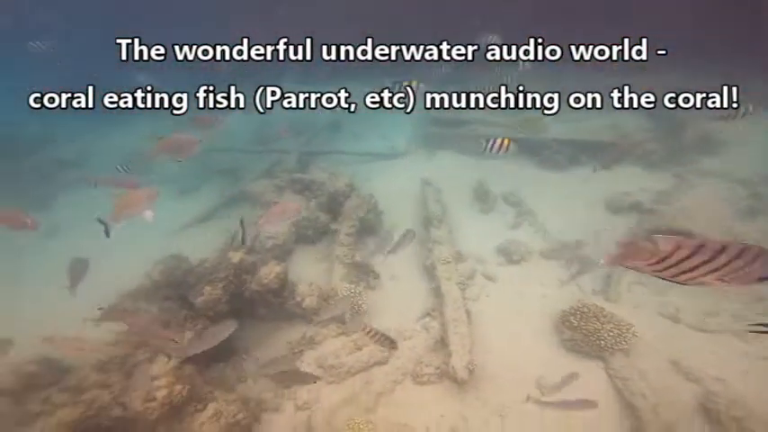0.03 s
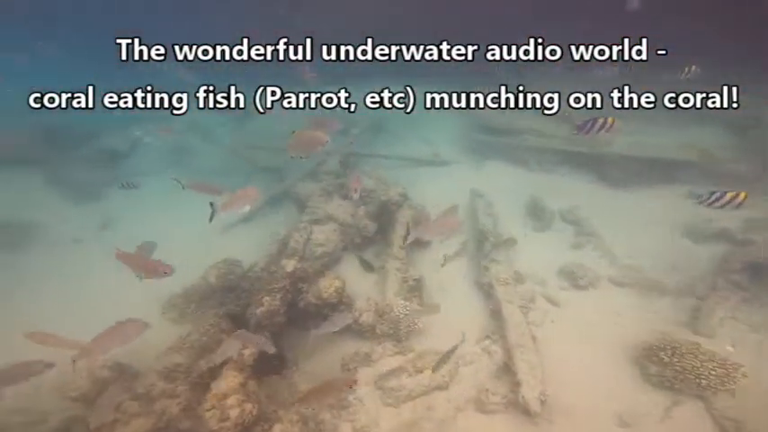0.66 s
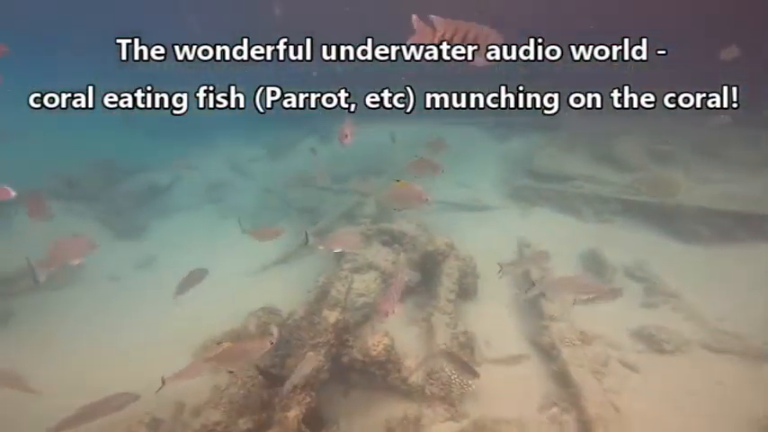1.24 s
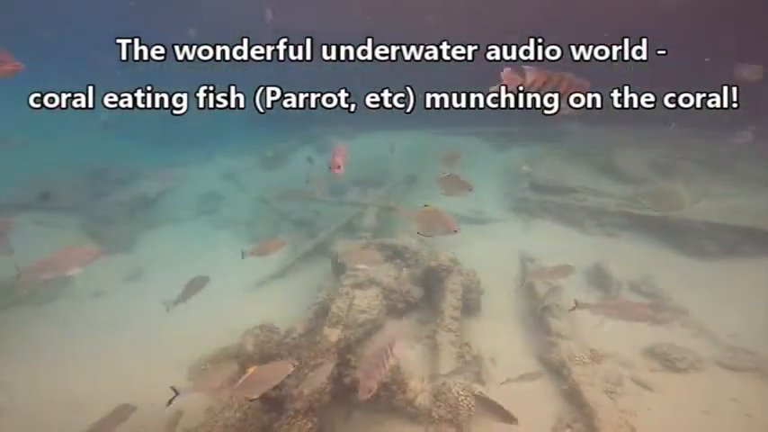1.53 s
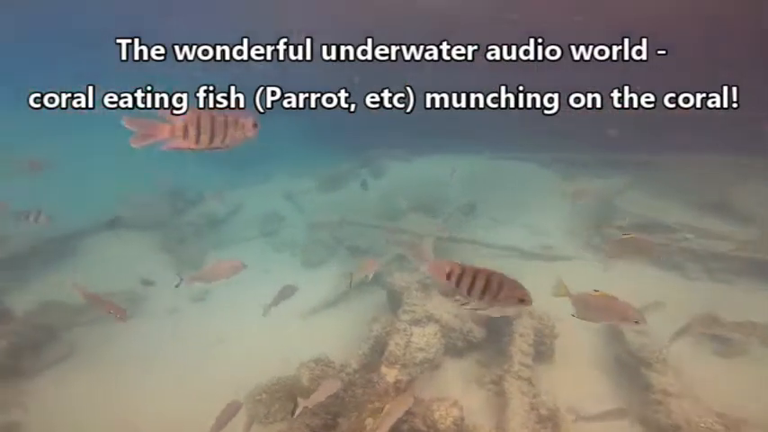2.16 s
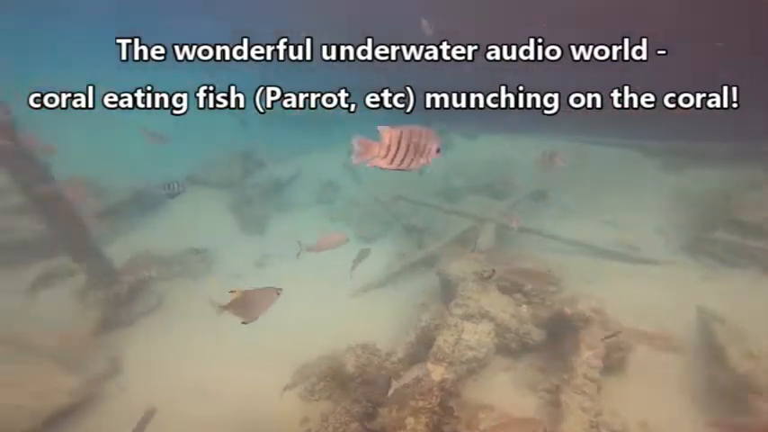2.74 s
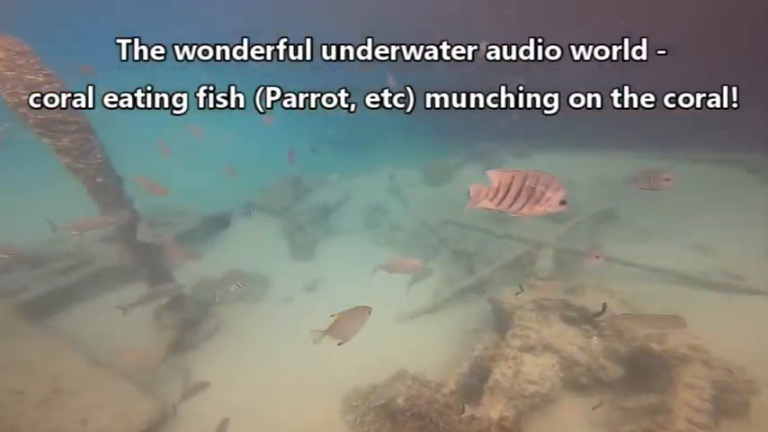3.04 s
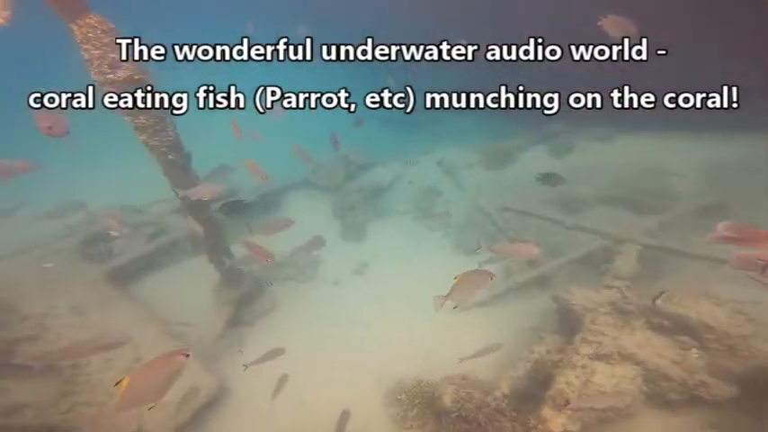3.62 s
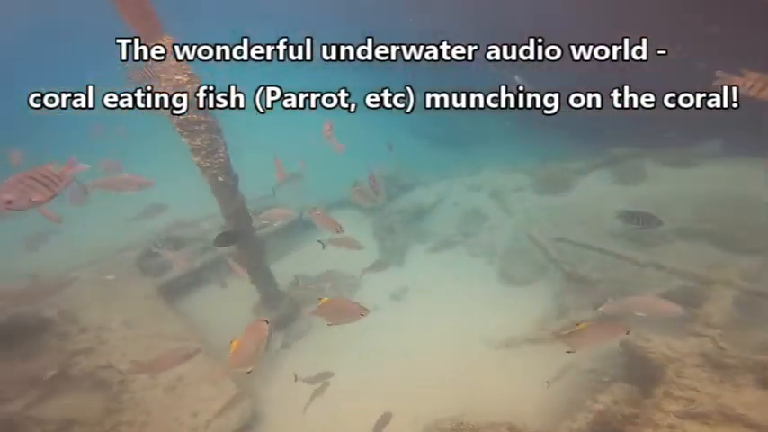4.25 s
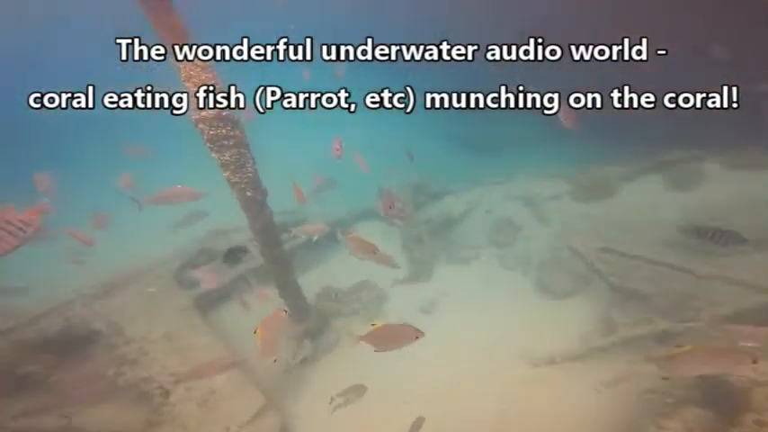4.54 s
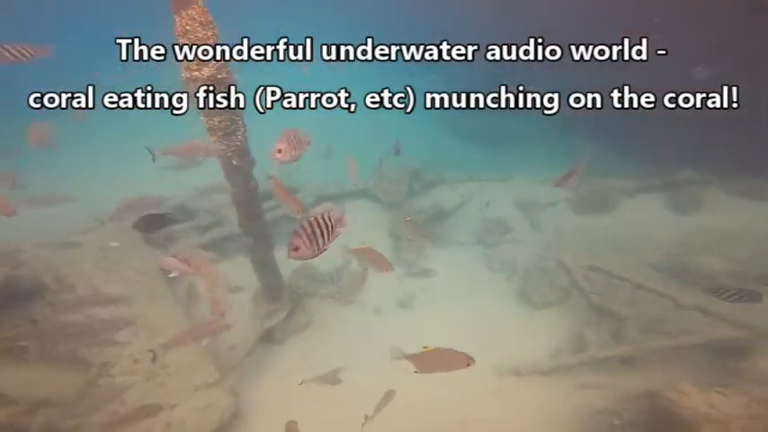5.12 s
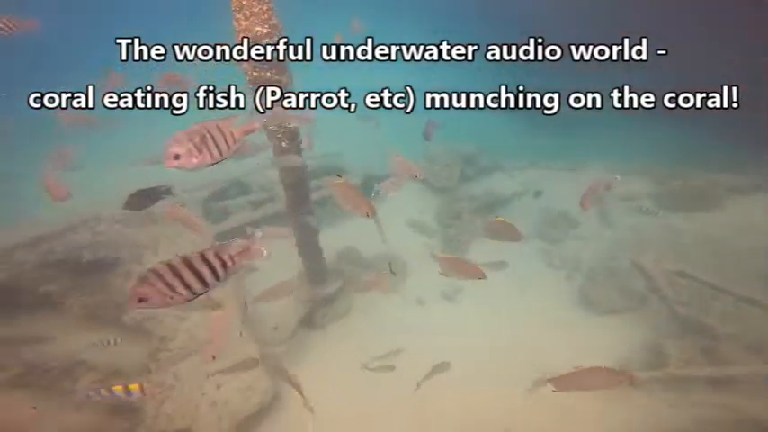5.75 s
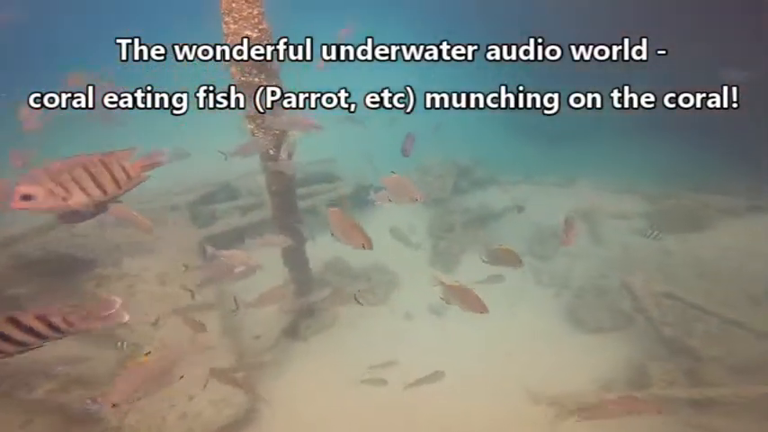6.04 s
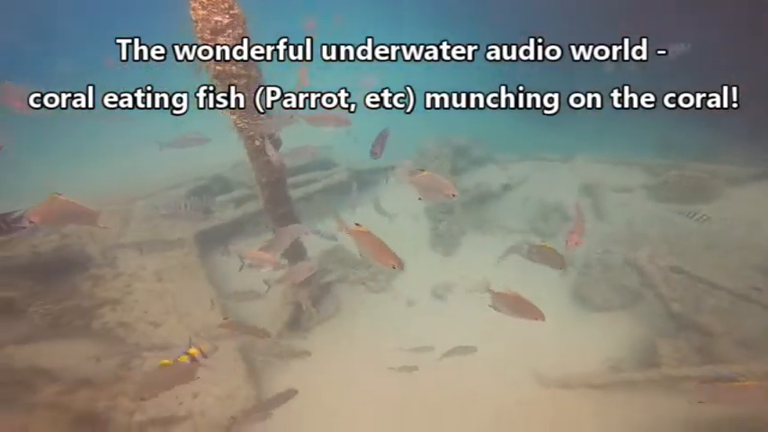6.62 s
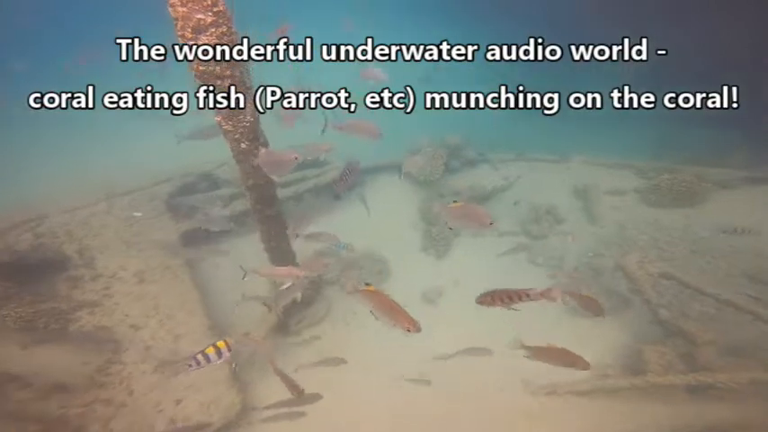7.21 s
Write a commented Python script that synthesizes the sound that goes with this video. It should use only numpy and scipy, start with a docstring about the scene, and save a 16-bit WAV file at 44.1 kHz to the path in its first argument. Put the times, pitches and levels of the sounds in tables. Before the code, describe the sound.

Fish bite coral and shrimps snap all around, a dense, uneven run of sharp clicks and occasional louder crunches over a faint frying crackle. Water sloshes past in surges, strongest at the start, and air bubbles gulp and ping. The microphone is underwater inside a camera housing, which rumbles in the hand and takes a few dull knocks after about a second.

```python
"""Coral reef, under water, heard through a camera's waterproof housing. Fish bite and scrape coral and
shrimps snap, near and far: sharp pulses with splintering and echoes that ring the housing's modes.
Air bubbles gulp and ping as damped tones; water sloshes past in surges of noise and small bubbles.
The hand that holds the housing rumbles and knocks."""
import sys
import numpy as np
from scipy import signal
from scipy.fft import rfft, irfft, next_fast_len
from scipy.io import wavfile
from scipy.ndimage import uniform_filter1d, map_coordinates

SR = 44100
rng = np.random.default_rng(int(sys.argv[2]) if len(sys.argv) > 2 else 0)


def generate_wav(sig):
    """Save sig (samples, or channels by samples) to the path in sys.argv[1] as 16-bit PCM at SR."""
    pcm = np.round(np.clip(np.atleast_2d(sig).T, -1, 1) * 32767).astype(np.int16)
    wavfile.write(sys.argv[1], SR, pcm)


N = 325017

# big coral pieces breaking: (time [s], relative level [dB], brightness centre [Hz], splintering [dB],
# lower mode [Hz], upper mode [Hz])
CORAL_BREAKS = [(0.4509, -29.5, 2650, 1, 2170, 5100), (0.9818, -33, 3900, -10, 1830, 7000),
                (1.8523, -26, 2670, -35, 2930, 3700), (2.5838, -32.5, 2930, -20, 1850, 3700),
                (2.6916, -33.5, 4070, -24, 3880, 5140), (2.834, -36, 3580, -30, 3700, 4500),
                (4.3138, -28, 3530, -4, 3650, 4580), (4.9078, -31.5, 2800, 1, 1840, 7300),
                (5.1998, -28.5, 4700, -10, 4100, 7040), (5.267, -24.5, 2190, -17, 1920, 2650),
                (5.683, -29, 3400, -25, 3120, 3920), (6.883, -32, 2950, -18, 1900, 2950),
                (6.9857, -36.5, 2610, -6, 1620, 2800)]
# near bites and snaps: (time [s], relative level [dB], brightness centre [Hz], splintering [dB])
NEAR_SNAPS = [(0.085, -51.5, 4170, -5), (0.157, -45.5, 3900, 4), (0.2857, -41, 3240, 7),
              (0.407, -44, 3080, -8), (0.5439, -35.5, 2500, 4), (0.567, -43.5, 3730, -25),
              (0.6435, -34.5, 3480, -14), (0.7814, -41, 3700, 22), (0.8321, -39, 3120, -19),
              (1.026, -46.5, 4220, -11), (1.107, -41.5, 3700, 0), (1.1984, -40, 2860, -25),
              (1.285, -38.5, 3700, -18), (1.4275, -44.5, 3460, -6), (1.5164, -43.5, 3740, -6),
              (1.7044, -38, 2640, -8), (1.726, -44, 3700, -9), (1.841, -40.5, 3340, 4),
              (1.987, -44, 3600, -19), (2.0658, -33, 3700, -9), (2.107, -44, 2980, -17),
              (2.1787, -36.5, 4100, 8), (2.2146, -45.5, 4150, 0), (2.326, -46, 3300, -7),
              (2.3629, -43.5, 2470, 12), (2.567, -43.5, 3660, -17), (3.057, -46, 1880, 8),
              (3.0997, -31.5, 4120, -4), (3.111, -41.5, 1640, 9), (3.2072, -43.5, 3300, 9),
              (3.3404, -36.5, 3350, -25), (3.3544, -43.5, 2850, -14), (3.4271, -36.5, 2640, -5),
              (3.5568, -41, 3120, -3.5), (3.6405, -37.5, 3320, -12), (3.7118, -42, 3700, -6),
              (3.7735, -37, 3170, -28), (3.8759, -43.5, 2820, 25), (4.051, -35.5, 3700, -10),
              (4.227, -45.5, 3550, -26), (4.4502, -42, 2670, 8), (4.6389, -40, 3460, 2),
              (4.717, -45, 2760, -16), (5.1005, -42.5, 3560, -1), (5.2321, -34, 3700, -17),
              (5.28, -35, 3700, -2), (5.355, -46, 3900, -12), (5.3933, -39, 4000, -26),
              (5.41, -41.5, 4200, -12), (5.465, -32.5, 2940, -9), (5.4695, -39, 3700, -14),
              (5.5616, -42.5, 4060, -23), (5.7098, -34, 3640, -15), (5.8351, -36, 3900, 6),
              (5.9143, -44, 2650, -3), (5.944, -45, 3750, -31), (6.1155, -33.5, 3050, -28),
              (6.218, -48, 4300, -11), (6.2289, -39, 3400, 0), (6.2931, -40, 3800, -3),
              (6.4365, -34.5, 2640, 0), (6.4787, -35.5, 2730, -8), (6.528, -33.5, 3700, -5),
              (6.6472, -36, 3270, -23), (6.697, -40, 2880, 12), (6.7127, -41, 2960, 8),
              (6.776, -45.5, 3630, -12), (6.8047, -38.5, 3500, -8), (6.9942, -32.5, 2500, -11),
              (7.095, -44.5, 2880, 24), (7.188, -45, 3240, -4), (7.3271, -35.5, 3050, -8),
              (7.357, -42.5, 2970, 4)]
# mean left-microphone lag of a crack: (time [s], lag [samples])
CRACK_LAG = [(0, 4.5), (3, 4.4), (5, 5), (7.4, 3.6)]
# teeth on coral: (start [s], hold [s], level [dB])
SCRAPES = [(0.866, 0.06, -56), (2.472, 0.11, -56.5), (2.586, 0.3, -55), (3.302, 0.019, -51),
           (4.289, 0.1, -56), (5.246, 0.025, -47.5), (5.418, 0.365, -56), (6.273, 0.0092, -47.5),
           (6.819, 0.07, -49.5)]
# tiniest snaps: (frequency [Hz], gain [dB])
SPARK_SPECTRUM = [(1500, -26), (4000, 5.5), (7200, -2), (9500, -10.5), (12500, -23), (15000, -22)]
# far crackle: (time [s], relative level [dB])
CRACKLE_LEVEL = [(0, -61), (2, -57.5), (2.6, -57.5), (5, -56.5), (5.3, -53), (5.9, -58.5), (7.37, -56.5)]
# air bubbles: (time [s], pitch [Hz], relative level [dB], rise [s], glide [octaves/s])
AIR_BUBBLES = [(.049, 626, -22, 0.00048, 4), (.068, 716, -28.5, 0.0064, -0.5),
               (.224, 536, -32.5, 0.0037, -0.5), (0.455, 542, -27.5, 0.026, -2.5),
               (0.566, 512, -28, 0.0061, -14), (1.299, 522, -32, 0.0035, -1.5), (1.37, 538, -44, 0.0083, 3),
               (1.565, 504, -33.5, 0.021, 1.5), (2.195, 449, -41, 0.016, 9), (2.3138, 513, -15, 0.0032, 11),
               (2.318, 640, -13, 0.0023, 3), (2.497, 579, -25, 0.0052, 13), (2.505, 541, -30.5, 0.018, 3.5),
               (2.628, 577, -32, 0.015, -9.5), (2.739, 453, -38, 0.011, 16.5),
               (3.565, 499, -35.5, 0.018, 3), (3.925, 418, -38, 0.016, 7.5), (4.149, 336, -43, 0.038, 1.5),
               (4.275, 445, -35, 0.0019, 5), (4.355, 666, -38, 0.018, -2.5), (4.476, 520, -36, 0.0058, 2),
               (5.084, 280, -39, 0.0043, -3.5), (5.142, 502, -36.5, 0.012, 1),
               (6.302, 589, -26.5, 0.0052, 5.5), (6.477, 530, -29, 0.00043, 1.5),
               (6.707, 475, -33.5, 0.017, 5.5), (7.047, 441, -34.5, 0.00078, 0),
               (7.064, 629, -37.5, 0.0047, -1.5)]
# one long glug of escaping air: (time [s], pitch [Hz])
GLUG_PITCH = [(2.465, 330), (2.505, 276.7), (2.56, 306), (2.61, 398.5), (2.72, 440)]
# small bubbles at the housing: (time [s], pitch [Hz], level [dB])
BUBBLE_PINGS = [(0.092, 985, -35), (0.215, 950, -43), (0.681, 1580, -42), (1.223, 2970, -30),
                (2.78, 2140, -38), (3.111, 960, -36), (3.306, 935, -47), (3.98, 1600, -42),
                (4.349, 1930, -34), (4.382, 1570, -43), (4.445, 1860, -33), (4.476, 1760, -35),
                (5.295, 994, -44.5), (6.28, 970, -45), (7.272, 1450, -36.5)]
# knocks on the housing: (time [s], relative level [dB])
HAND_KNOCKS = [(0.501, -31.5), (1.1725, -15.5), (1.2565, -23), (1.399, -32), (1.479, -33), (2.313, -27.5),
               (4.523, -33.5), (5.943, -40.5), (6.48, -46), (6.742, -40)]
# housing pushed as a whole: (frequency [Hz], gain [dB], t60 [s])
THUD_MODES = [(111, 4.5, 0.012), (256, 2.5, 0.02), (440, 8, 0.011)]
# housing wall: (frequency [Hz], gain [dB], t60 at the hardest knock [s])
WALL_MODES = [(1594, 4, 0.042), (1640, -16, 0.065), (1410, -1, 0.02), (2930, -11, 0.011)]
# water surges: (start [s], hold [s], relative level [dB])
WATER_SURGES = [(0, 0.067, -39), (0.096, 0.44, -45.5), (1.116, 0.37, -53), (2.322, 0.017, -48.5),
                (3.046, 1.16, -51), (3.7, 0.014, -47.5), (4.308, 0.16, -47), (5.08, 0.48, -57.5),
                (7.027, 0.041, -51)]
# churning water: (frequency [Hz], gain [dB])
SLOSH_SPECTRUM = [(60, -62), (120, 0.5), (195, 4.5), (280, 1.5), (400, 3.5), (510, 6), (660, 3.5),
                  (830, -24.5), (980, -9), (1300, -19), (2500, -20), (8000, -120)]
# upper edge of the slosh: (time [s], frequency [Hz])
SLOSH_CUTOFF = [(0, 724), (2.9, 774), (3.15, 520), (3.62, 510), (3.71, 680), (3.8, 510), (4.2, 500),
                (4.36, 797)]
# shifts of the grip: (start [s], hold [s], relative level [dB])
GRIP_SHIFTS = [(0.878, 0.53, -43.5), (2.129, 0.073, -36.5), (3.18, 0.27, -41), (3.64, 0.94, -46),
               (4.356, 0.14, -37.5), (4.788, 1, -50.5), (5.52, 0.42, -43), (6.052, 0.61, -43.5),
               (6.746, 0.051, -29.5)]
# flexing housing: (frequency [Hz], gain [dB])
RUMBLE_SPECTRUM = [(8, -13), (22, 9), (35, -10), (55, -1), (75, -3.5), (92, 4), (112, -8.5), (140, -17.5),
                   (250, -44.5), (1500, -120)]
# housing resonances; the silent 640 Hz row only flips the later signs, leaving a dip near 830 Hz:
# (frequency [Hz], width [Hz], left gain [dB], right gain [dB])
HOUSING_MODES = [(600, 72, -0.5, 1.5), (640, 190, -60, -71), (960, 27, -3, 0.5), (1359, 79, 4, -1),
                 (1584, 69, 6.5, 4.5), (1807, 85, 10.5, 5), (2083, 317, 5.5, 2.5), (2500, 112, 9, 8),
                 (2890, 171, 10, 4), (3700, 590, 5.5, 3), (4634, 490, 0.5, 3.5), (5615, 410, -3, -1.5),
                 (7250, 1110, -10, -10), (7400, 3700, -58, -18), (12400, 260, -50.5, -22.5)]
# extra phase of the left microphone: (frequency [Hz], phase [rad])
LEFT_PHASE = [(200, -1.03), (500, -0.65), (1000, -1.09), (2000, 0.78), (5000, 1), (8000, 0.059)]

SURGE_ATTACK_S, SURGE_T60_S, CALM_DB = 0.0019, 0.71, -61.5


def crunches(gain_db=1):
    """A big bite breaks off a piece that knocks hollowly at its own two pitches."""
    return amp(gain_db) * cracks(CORAL_BREAKS, ripple_db=3.15, low_hz=1450, soft_hz=9000)


def snaps(gain_db=1):
    """Fish biting coral and shrimps snapping close by."""
    return amp(gain_db) * cracks(NEAR_SNAPS, ripple_db=2.5, low_hz=1150, soft_hz=12500)


def cracks(rows, ripple_db, low_hz, soft_hz, crack_t60_s=0.015, tail_t60_s=0.071, far_t60_s=0.12,
           ring_db=5, ring_q=9, lag_spread_samples=0.74, sparkle_db=3, size=4096):
    """Per row: a sharp pulse, short splintering and reef echoes, all ringing the housing."""
    out, t, hz = np.zeros((2, N)), np.arange(size) / SR, np.fft.rfftfreq(size, 1 / SR)
    log_hz = np.log(np.clip(hz, 1450, 7500))
    tilts = np.linspace(-3, 2.5, 12)
    slopes = np.exp(2 * np.outer(tilts, log_hz - log_hz.mean()))
    highpass = signal.freqs(*signal.butter(3, low_hz, 'high', analog=True), hz)[1]
    body = housing(hz, lag_samples=0) * highpass / (1 + (hz / soft_hz) ** 2)
    half_octaves = 2 * np.log2(np.clip(hz / 900, 1, 8))
    top_octave = np.log2(np.clip(hz / 5500, 1, 2))
    for time_s, db, centre_hz, splinter_db, *modes_hz in rows:
        crack = (t == 0) + amp(-1) * scatter(t, crack_t60_s, spiky=1)
        splinters = amp(splinter_db + 1) * scatter(t, tail_t60_s, spiky=1)
        echoes = amp(-19) * scatter(t, far_t60_s, spiky=1)
        pulse = crack + splinters + echoes
        # short waves from the sides differ per microphone
        sides = amp(-1) * np.array([scatter(t, 2 * crack_t60_s, spiky=0.56) for _ in range(2)])
        spectrum = (rfft(pulse) + np.linalg.norm(pulse) * rfft(sides) * hz / (hz + 3000)) * body
        # own direction and colour per crack
        lag_samples = np.interp(time_s, *np.transpose(CRACK_LAG))
        lag_samples += lag_spread_samples * rng.standard_normal()
        spectrum[0] *= np.exp(-2j * np.pi * hz / SR * lag_samples)
        ripple = map_coordinates(np.append(0, rng.standard_normal(11)), [half_octaves])
        spectrum *= amp(ripple_db * ripple)
        spectrum *= amp(sparkle_db * rng.standard_normal((2, 1)) * top_octave)
        for mode_hz in modes_hz:
            loss = 1j * hz * mode_hz / ring_q
            spectrum *= 1 + amp(ring_db) * loss / (mode_hz ** 2 - hz ** 2 + loss)
        # a quicker fracture is brighter: tilt the centroid towards centre_hz
        power = slopes * np.sum(abs(spectrum) ** 2, 0)
        tilt = np.interp(np.log(centre_hz), power @ log_hz / power.sum(1), tilts)
        sound = np.roll(irfft(spectrum * np.exp(tilt * log_hz)), SR // 500, axis=1)  # 2 ms lead-in
        sound /= np.sqrt(np.mean(sound[:, :SR // 80] ** 2))
        add(out, time_s - .002, amp(db) * sound)
    return out


def rasps(attack_s=0.002, t60_s=0.21, dull_hz=1100):
    """Teeth scrape coral: runs of dull little fractures that swell and die away."""
    grit = impulses(rate_per_s=700, spread_db=5)
    heard = filtered(grit, lambda hz: housing(hz, lag_samples=5.05) / (1 + 1j * hz / dull_hz) ** 2)
    envelope = sum(amp(db) * swell(start_s, attack_s, hold_s, t60_s) for start_s, hold_s, db in SCRAPES)
    return unit(heard) * envelope


def ticks(count=290, level_db=-56, spread_db=6):
    """Weaker snaps from all over the reef, blurred by distance."""
    loudness, brightness, splintering = rng.standard_normal((count, 3)).T
    times_s = rng.uniform(0, N / SR, count)
    levels_db = level_db + spread_db * np.minimum(loudness, 1)
    centres_hz = 3350 * np.exp(.28 * brightness)
    splinters_db = -1 + 6 * splintering
    rows = np.transpose([times_s, levels_db, centres_hz, splinters_db])
    return cracks(rows, ripple_db=2, low_hz=1150, soft_hz=9500)


def bubbles(glug_db=-33, ring_t60_s=0.076, halving_db=23, wash_db=-15, wash_t60_s=0.16, top_hz=780):
    """A bubble swells as it breaks free, rings and glides as its shape changes; a large one glugs."""
    glug_envelope = swell(GLUG_PITCH[0][0], attack_s=0.029, hold_s=0.0053, t60_s=0.68)
    out = amp(glug_db) * glug_envelope * air_tone(curve(GLUG_PITCH))
    t = np.arange(SR // 3) / SR
    for time_s, hz, db, rise_s, octaves_per_s in AIR_BUBBLES:
        t60_s = ring_t60_s * 2 ** (-(db + 30) / halving_db)  # louder dies faster
        onset = np.sin(np.pi / 2 * np.minimum(t / rise_s, 1)) ** 2
        decay = amp(-60 * np.maximum(t - rise_s, 0) / t60_s)
        add(out, time_s, amp(db) * onset * decay * air_tone(hz * 2 ** (octaves_per_s * t)))
    # disturbed water washes on briefly
    wash = signal.oaconvolve(out * wobble(rate_hz=60), scatter(t, wash_t60_s, spiky=0))[:N]
    dull = filtered(out + amp(wash_db) * wash, lambda hz: 1 / (1 + (hz / top_hz) ** 12))
    return panned(dull, pan_db=-1.7)


def air_tone(hz, roughness=0.25):
    """Shaky tone of an air pocket; pitch given per sample."""
    shake = unit(uniform_filter1d(rng.standard_normal((2, len(hz))), size=260, axis=1))
    jitter_rad, tremor = roughness * shake
    return (1 + tremor) * np.sin(2 * np.pi * np.cumsum(hz) / SR + jitter_rad)


def pings(t60_cycles=58, attack_s=0.00059):
    """Small bubbles, each ringing at one high pitch."""
    out = np.zeros(N)
    for time_s, hz, db in BUBBLE_PINGS:
        add(out, time_s, struck([(hz, db, t60_cycles / hz)], attack_s))
    return out


def knocks(wall_db=4.5, hard_db=-23, fade_db_per_db=11, halving_db=14):
    """Soft bumps only thud; hard ones also ring the housing's wall, longer the harder they are."""
    out, hardest_db = np.zeros(N), max(db for _, db in HAND_KNOCKS)
    for time_s, thud_db in HAND_KNOCKS:
        ring_db = thud_db + wall_db - fade_db_per_db * max(hard_db - thud_db, 0)
        t60_scale = 2 ** ((thud_db - hardest_db) / halving_db)
        wall = [(hz, db, t60_s * t60_scale) for hz, db, t60_s in WALL_MODES]
        thud = amp(thud_db) * struck(THUD_MODES, attack_s=0.00037)
        ring = amp(ring_db) * struck(wall, attack_s=0.0027)
        add(out, time_s, thud + ring)
    return out


def splashes(gain_db=-24, t60_s=0.13, dull_hz=2000):
    """Each knock shakes the water at the housing into a short rough splash."""
    noise = rng.standard_normal(N)
    stirred = filtered(noise, lambda hz: housing(hz, lag_samples=5.1) / (1 + (hz / dull_hz) ** 2))
    envelope = sum(amp(db) * swell(time_s, SURGE_ATTACK_S, 0, t60_s) for time_s, db in HAND_KNOCKS)
    return amp(gain_db) * unit(stirred) * envelope


def slosh(gurgle_db=2, burble_db=-3, flutter_db=1, gain_db=2.64):
    """Water passing the housing: churn, gurgles and a few clearer bubbles."""
    gurgles = swarm(count=2200, low_hz=134.7, high_hz=684.4, t60_cycles=34.7, spread_db=12.5, rise=.13)
    burble = swarm(count=170, low_hz=440, high_hz=559, t60_cycles=48, spread_db=13.5, rise=.13)
    churn = coloured(rng.standard_normal(N), SLOSH_SPECTRUM)
    water = churn + amp(gurgle_db) * coloured(gurgles, SLOSH_SPECTRUM) + amp(burble_db) * burble
    envelope = flow(SURGE_T60_S, CALM_DB) * amp(gain_db + flutter_db * wobble(rate_hz=12))
    return panned(unit(slosh_edge(water)) * envelope, pan_db=-2)


def slosh_edge(x, peak_db=4, shelf_db=-8):
    """Moving high shelf, resonant at its edge: the slosh dulls and brightens."""
    hz, times_s, frames = signal.stft(x, SR, nperseg=2048)
    ratio = hz[:, None] / np.interp(times_s, *np.transpose(SLOSH_CUTOFF))
    gain_db = shelf_db * (1 - 1 / (1 + ratio ** 20)) + peak_db / (1 + (10 * (ratio - 1)) ** 2)
    return signal.istft(frames * amp(gain_db), SR, nperseg=2048)[1][:N]


def flow(t60_s, calm_db):
    """Gain of the stirred water: surges over a calm floor."""
    surge_power = sum((amp(db) * swell(start_s, SURGE_ATTACK_S, hold_s, t60_s)) ** 2
                      for start_s, hold_s, db in WATER_SURGES)
    return np.sqrt(amp(calm_db) ** 2 + surge_power)


def rumble(grip_db=-48, attack_s=0.0042, t60_s=0.22, lumps_db=2, flow_db=-3):
    """The grip flexes the housing in lumps, mostly on the left; passing water adds to it."""
    shared = amp(-6.5) * panned(coloured(rng.standard_normal(N), RUMBLE_SPECTRUM), pan_db=16)
    separate = amp(-12) * coloured(rng.standard_normal((2, N)), RUMBLE_SPECTRUM)
    shift_power = sum((amp(db) * swell(start_s, attack_s, hold_s, t60_s)) ** 2
                      for start_s, hold_s, db in GRIP_SHIFTS)
    power = amp(grip_db) ** 2 + shift_power + (amp(flow_db) * flow(SURGE_T60_S, CALM_DB)) ** 2
    return (shared + separate) * np.sqrt(power) * amp(lumps_db * wobble(rate_hz=11))


def fizz(gain_db=-16, chirp_db=-5):
    """Tiny bubbles patter steadily and flare briefly with each surge; a few larger ones chirp."""
    patter = swarm(count=5000, low_hz=750, high_hz=2800, t60_cycles=30, spread_db=10, rise=.02)
    chirps = swarm(count=90, low_hz=1250, high_hz=2700, t60_cycles=110, spread_db=8, rise=.04)
    heard = filtered(patter + amp(chirp_db) * chirps, lambda hz: housing(hz, lag_samples=4.5))
    return unit(heard) * amp(gain_db) * flow(t60_s=0.45, calm_db=-50)


def simmer(gain_db=-18):
    """Mid-sized bubbles merge into a soft wash, louder in stirred water."""
    plips = swarm(count=2400, low_hz=720, high_hz=1500, t60_cycles=26, spread_db=8, rise=.01)
    return plips * amp(gain_db) * flow(SURGE_T60_S, calm_db=-51)


def crackle(tail_t60_s=0.0052, hiss_db=-4, gain_db=-3, tilt=0.59):
    """Countless far snaps merge into a soft frying."""
    pops = impulses(rate_per_s=900, spread_db=5)
    t = np.arange(SR // 20) / SR
    paths = (t == 0) + .5 * np.array([scatter(t, tail_t60_s, spiky=0.16) for _ in range(2)])
    water = unit(signal.oaconvolve(pops[None], paths, axes=1)[:, :N])
    water += amp(hiss_db) * rng.standard_normal(N)
    heard = filtered(water, lambda hz: housing(hz, lag_samples=5.38) * (1 + hz / 3000) ** tilt)
    return unit(heard) * amp(curve(CRACKLE_LEVEL) + gain_db)


def sparks(level_db=-66, rate_per_s=24, spread_db=6, t60_s=0.026):
    """Tiny shrimps nearby: thin bright spits of grit."""
    onsets = rng.random(N) < rate_per_s / SR
    energy = onsets * amp(spread_db * np.minimum(rng.standard_normal(N), 1)) ** 2
    power = signal.lfilter([1], [1, -amp(-60 / (t60_s * SR)) ** 2], energy)
    grit = rng.standard_normal((2, N)) * np.exp(.5 * rng.standard_normal((2, N)))
    return amp(level_db) * coloured(grit * np.sqrt(power), SPARK_SPECTRUM)


def housing(hz, lag_samples):
    """Response from the water to the two microphones inside; the left one lags."""
    modes = 0
    for k, (mode_hz, width_hz, left_db, right_db) in enumerate(HOUSING_MODES):
        loss = 1j * hz * width_hz
        modes += (-1) ** k * amp([[left_db], [right_db]]) * loss / (mode_hz ** 2 - hz ** 2 + loss)
    return modes * np.exp(np.outer([-2j * np.pi * lag_samples / SR, 0], hz))


def scatter(t, t60_s, spiky):
    """Uneven decaying echoes off rock and sand; energy 1."""
    echoes = rng.standard_normal(len(t)) * np.exp(spiky * rng.standard_normal(len(t)))
    echoes *= amp(-60 * t / t60_s)
    return echoes / np.linalg.norm(echoes)


def swarm(count, low_hz, high_hz, t60_cycles, spread_db, rise):
    """Many small bubbles, each dying away as its pitch rises; rms 1."""
    out, t = np.zeros(N), np.arange(int(SR * t60_cycles / low_hz)) / SR
    for when, pitch, strength in rng.random((count, 3)):
        hz = low_hz * (high_hz / low_hz) ** pitch
        age = hz * t / t60_cycles
        envelope = amp(-60 * age) * (1 - np.exp(-hz * t))
        ring = np.sin(2 * np.pi * hz * t * (1 + rise * age)) * envelope
        add(out, when * N / SR, amp(spread_db * strength ** 2) * np.sqrt(hz) * ring)
    return unit(out)


def struck(modes, attack_s):
    """Damped modes set off by one blow; neighbours in opposite phase."""
    t = np.arange(SR // 5) / SR
    ring = sum((-1) ** k * amp(db + rng.normal(0, 1) - 60 * t / t60_s) * np.sin(2 * np.pi * hz * t)
               for k, (hz, db, t60_s) in enumerate(modes))
    return ring * (1 - np.exp(-t / attack_s))


def impulses(rate_per_s, spread_db):
    """Clicks of random time, size and sign."""
    onsets = rng.random(N) < rate_per_s / SR
    return onsets * amp(spread_db * np.minimum(rng.standard_normal(N), 2)) * rng.choice([-1, 1], N)


def swell(start_s, attack_s, hold_s, t60_s):
    """Gain that rises, holds, then dies away."""
    t = np.arange(N) / SR - start_s
    return np.clip(t / attack_s, 0, 1) * amp(-60 * np.maximum(t - attack_s - hold_s, 0) / t60_s)


def wobble(rate_hz):
    """Smooth random curve with knots at rate_hz."""
    knots = rng.standard_normal(int(N * rate_hz / SR) + 4)
    return map_coordinates(knots, [np.arange(N) * rate_hz / SR])


def curve(rows):
    """(time [s], value) rows as one value per sample."""
    return np.interp(np.arange(N) / SR, *np.transpose(rows))


def filtered(x, response):
    """x times a complex frequency response."""
    size = next_fast_len(N + SR // 2)
    return irfft(rfft(x, size) * response(np.fft.rfftfreq(size, 1 / SR)), size)[..., :N]


def coloured(x, points):
    """x shaped by (frequency [Hz], gain [dB]) points; rms 1."""
    points_hz, db = np.transpose(points)
    return unit(filtered(x, lambda hz: amp(np.interp(np.log(hz + 1), np.log(points_hz), db))))


def panned(x, pan_db):
    """Left louder than right by pan_db."""
    return x * amp([[pan_db / 2], [-pan_db / 2]])


def add(track, time_s, sound):
    """Mix a sound into the track."""
    part = track[..., max(round(time_s * SR), 0):][..., :sound.shape[-1]]
    part += sound[..., :part.shape[-1]]


def amp(db):
    """Decibels to gain."""
    return 10 ** (np.asarray(db) / 20)


def unit(x):
    """x at rms 1."""
    return x / np.sqrt(np.mean(x ** 2) + 1e-20)


def scene():
    """Reef life over the water and the hand at the housing."""
    reef = crunches() + snaps() + rasps() + ticks() + sparks() + crackle()
    return reef + fizz() + simmer() + pings() + bubbles() + knocks() + splashes() + slosh() + rumble()


def record(dry):
    """Microphones on different walls differ in phase; the camera limits the band."""
    top_hz = 15700
    phase_shift = lambda hz: np.exp(np.outer([1j, 0], np.interp(hz, *np.transpose(LEFT_PHASE))))
    return filtered(dry, lambda hz: phase_shift(hz) * (hz < top_hz))


dry = scene()
out = record(dry)
generate_wav(out)
```